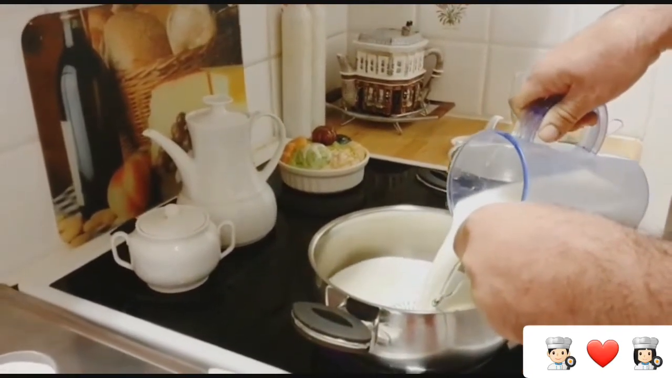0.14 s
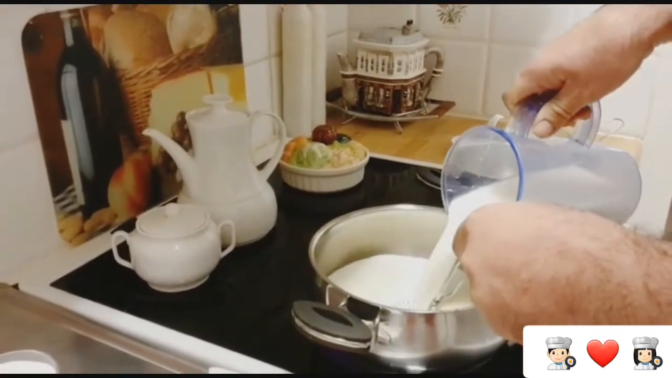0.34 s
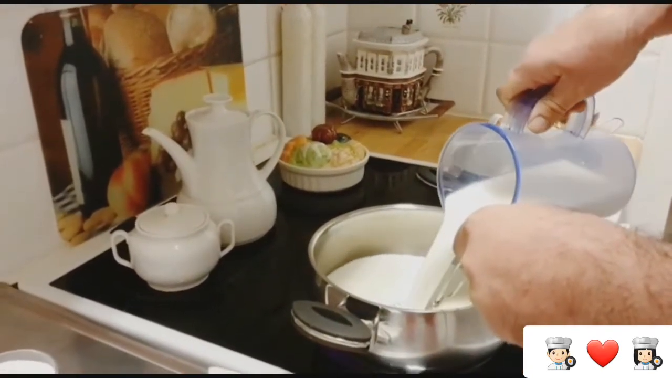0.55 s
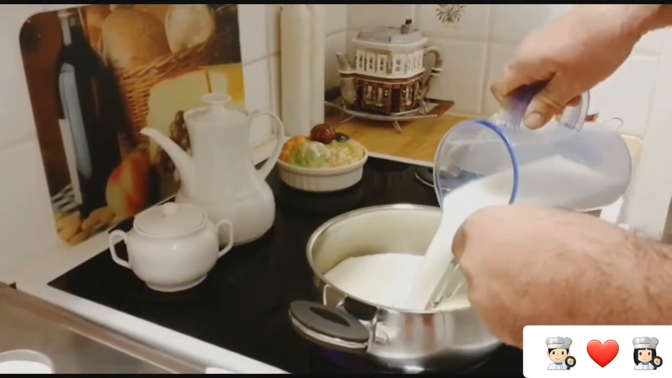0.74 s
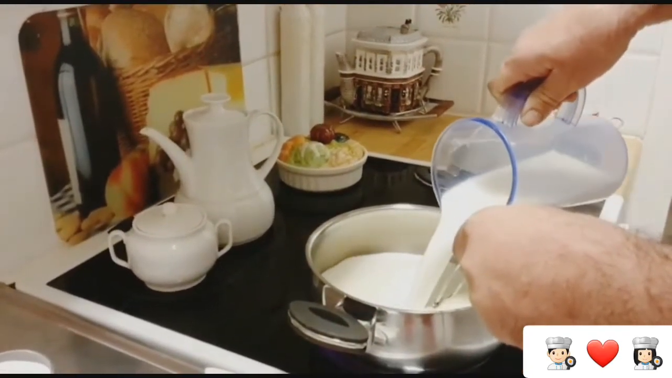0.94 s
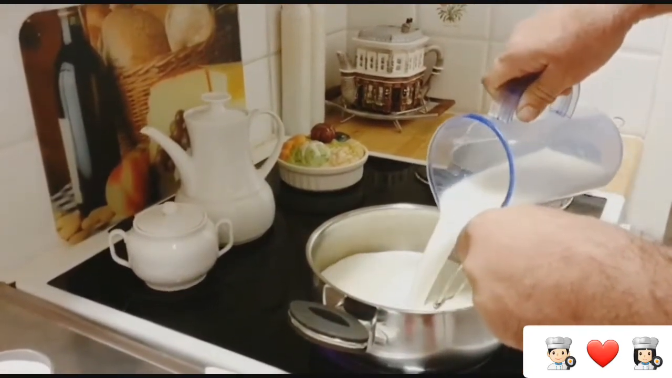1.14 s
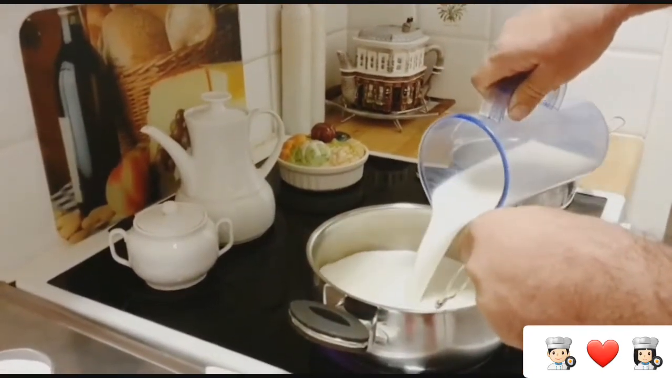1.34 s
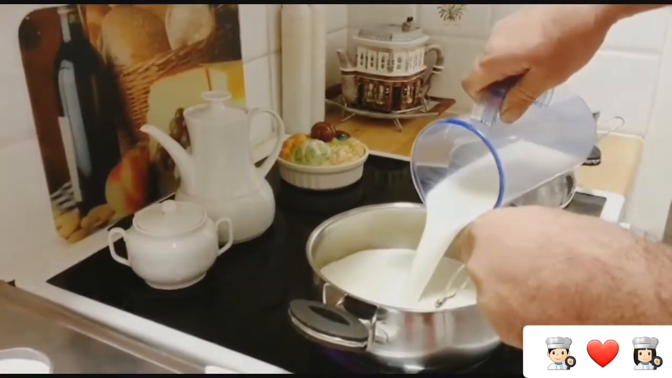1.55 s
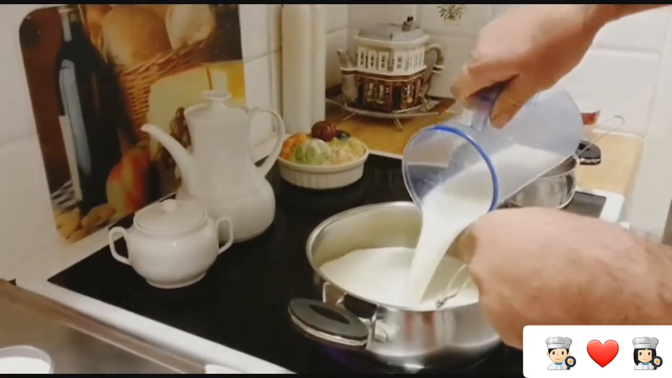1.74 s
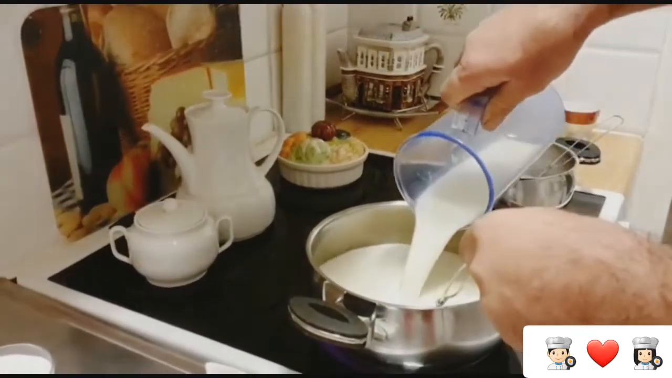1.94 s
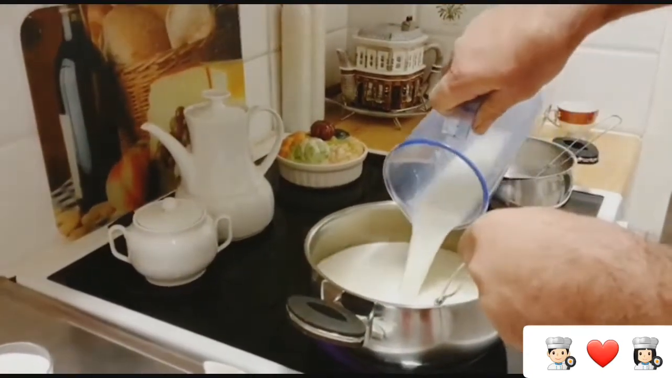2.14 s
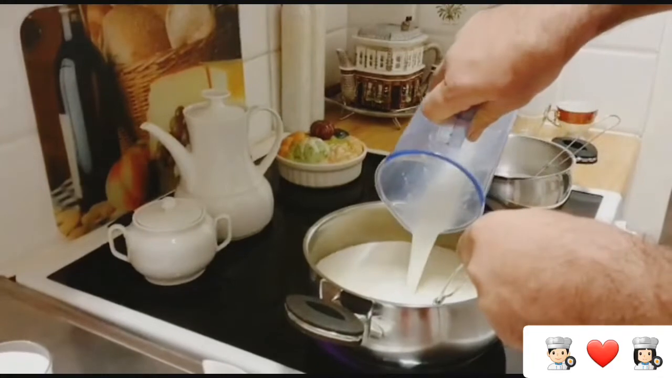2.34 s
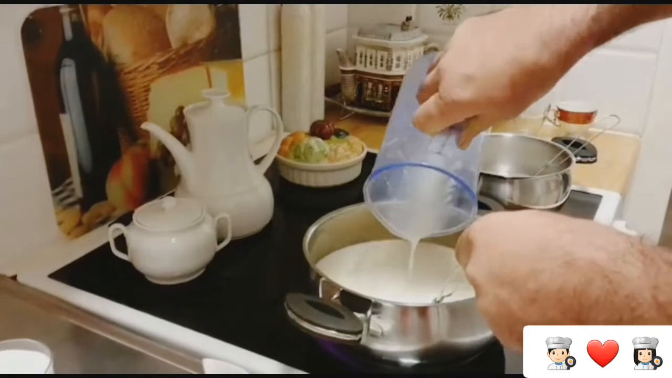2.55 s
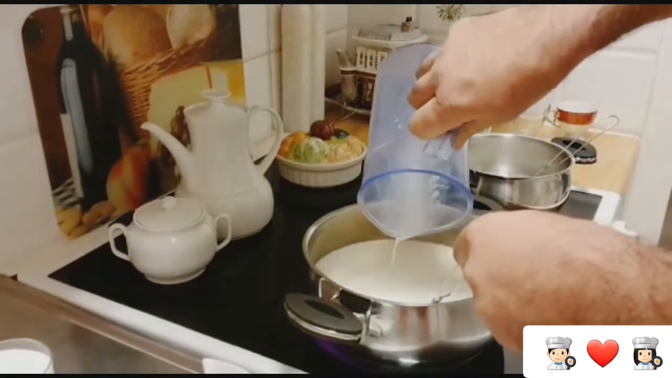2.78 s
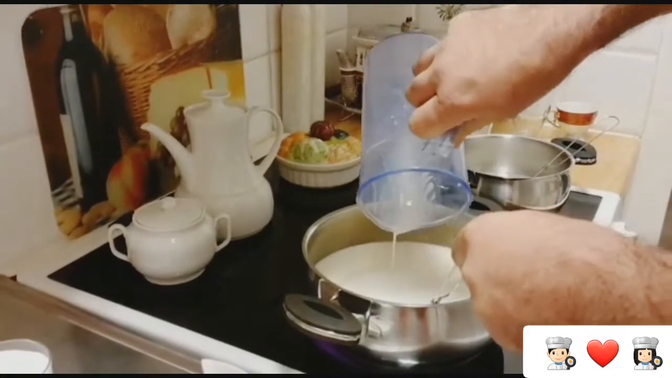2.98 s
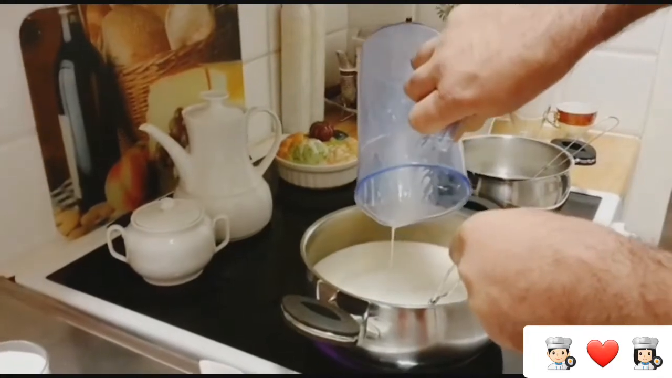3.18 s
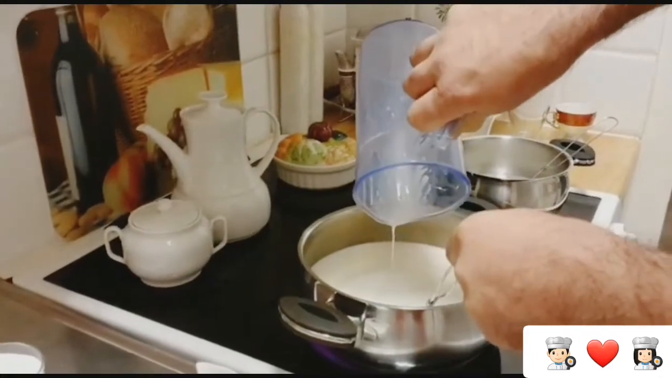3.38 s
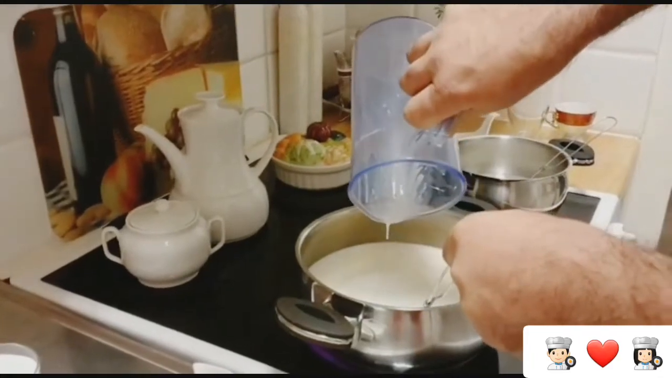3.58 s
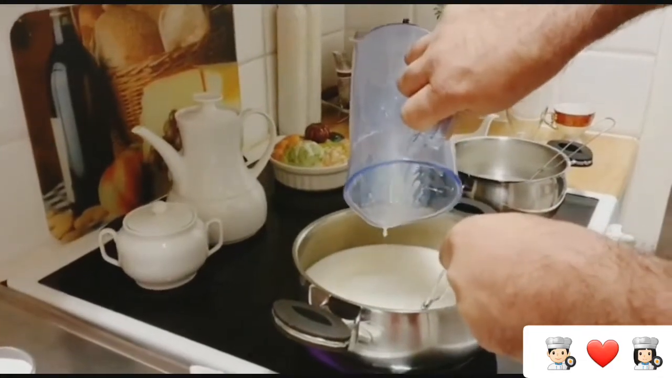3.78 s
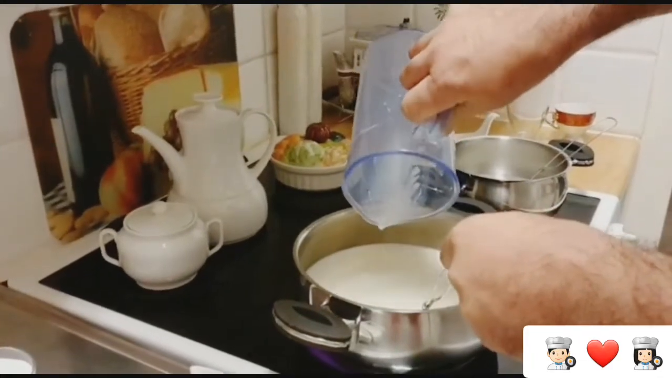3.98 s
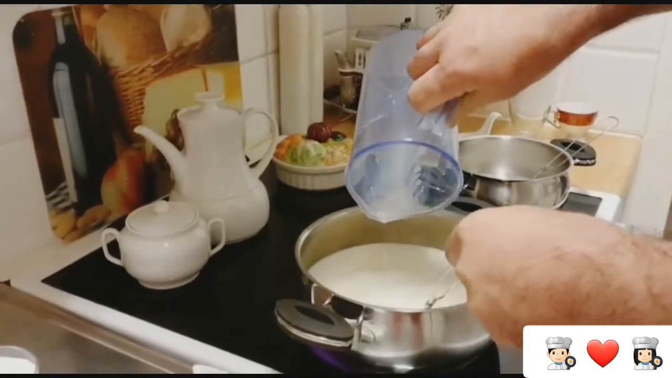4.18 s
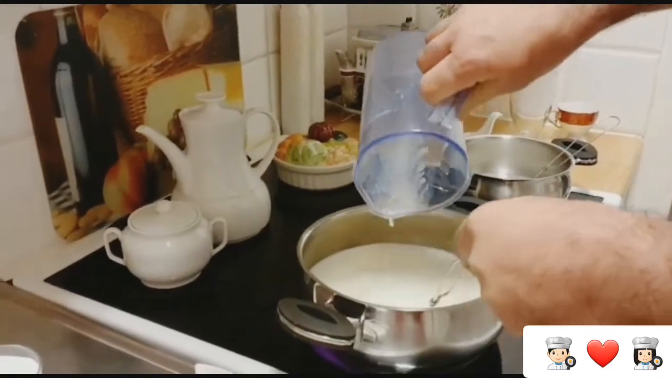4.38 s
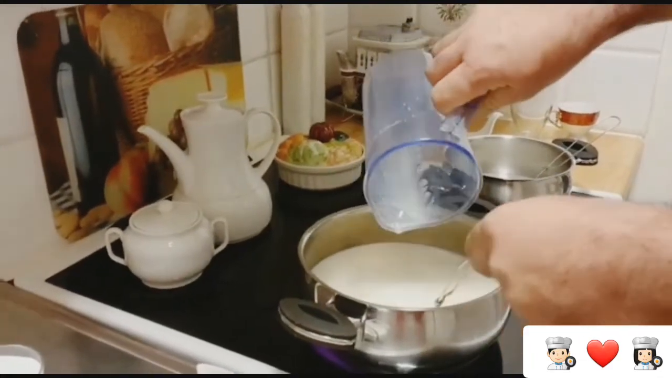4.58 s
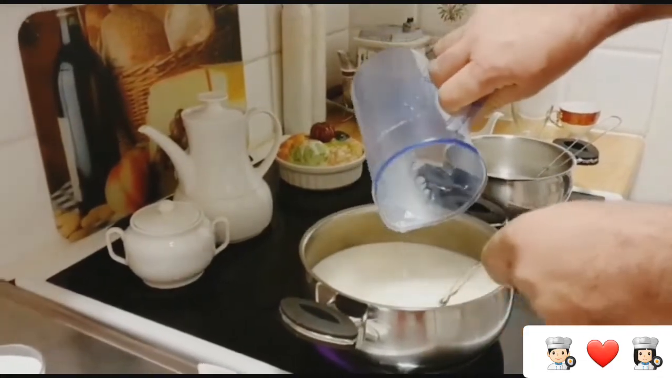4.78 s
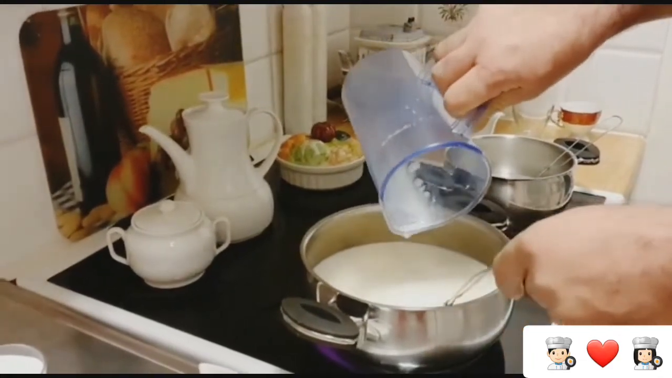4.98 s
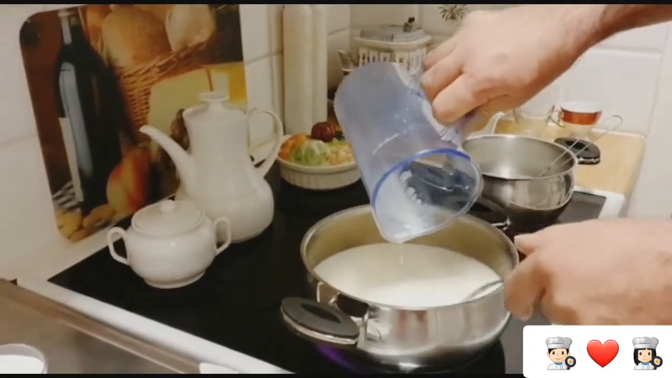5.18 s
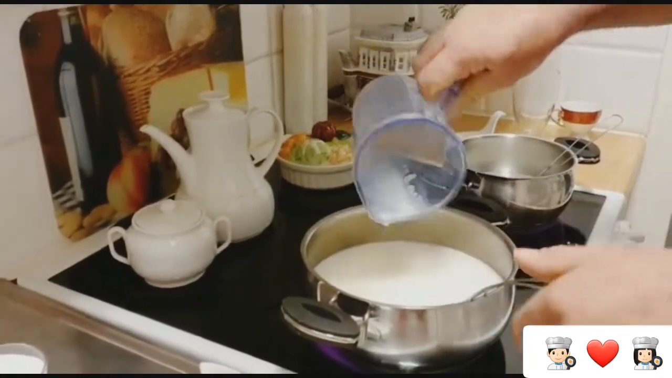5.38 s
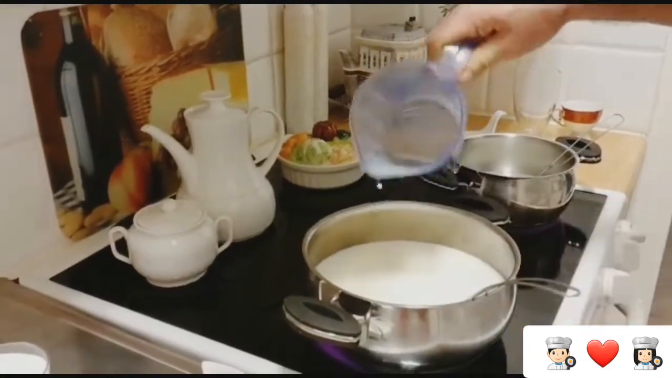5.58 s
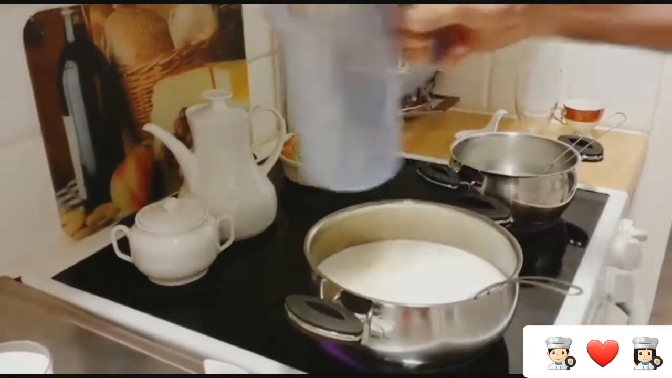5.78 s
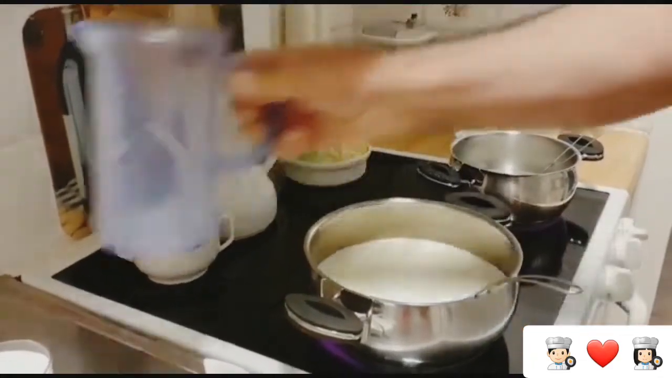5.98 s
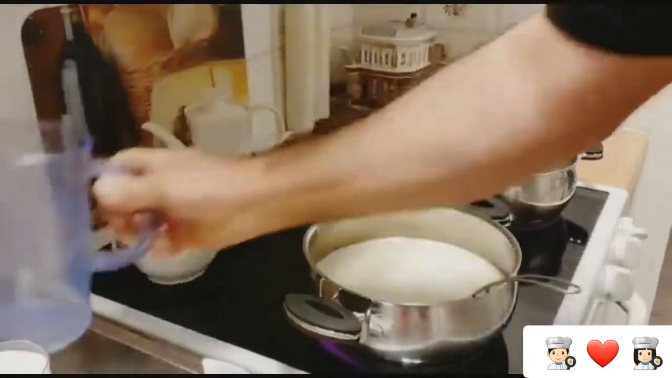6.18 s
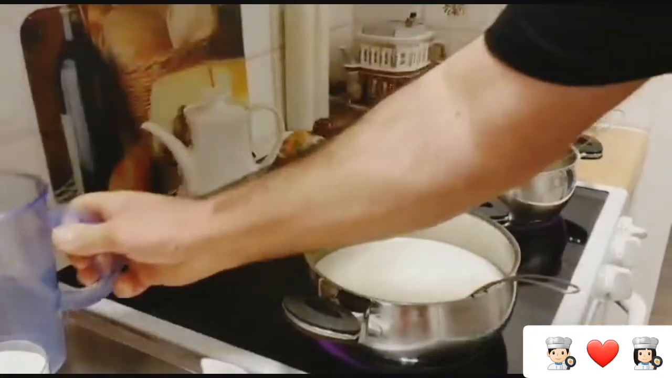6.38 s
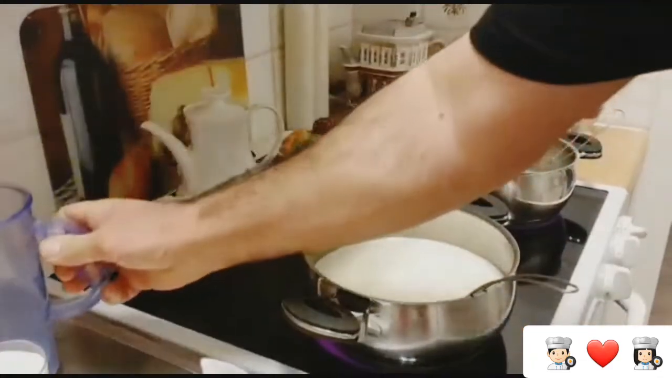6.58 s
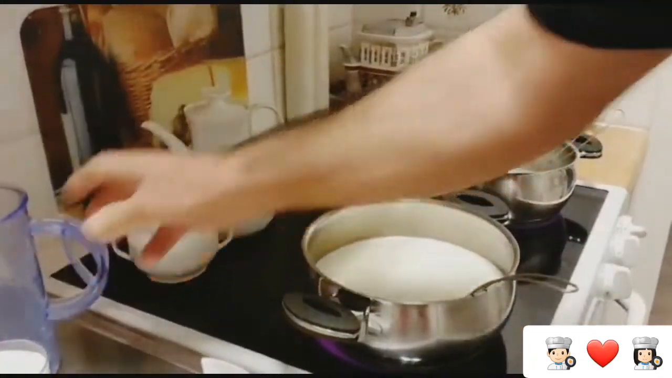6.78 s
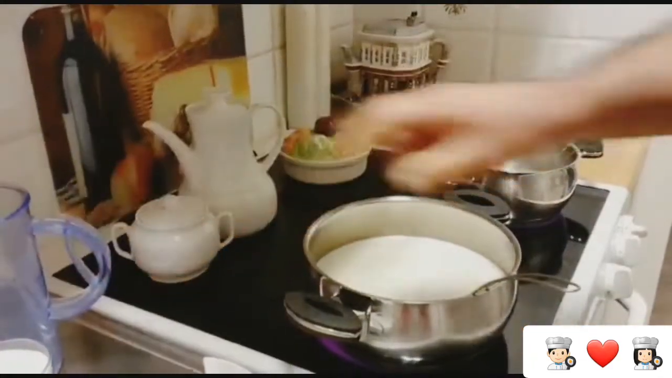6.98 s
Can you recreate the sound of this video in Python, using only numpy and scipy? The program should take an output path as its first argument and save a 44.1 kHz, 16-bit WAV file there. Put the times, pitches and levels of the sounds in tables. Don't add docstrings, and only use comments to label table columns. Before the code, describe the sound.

In a softly humming kitchen, poured milk bubbles and drips, hands scuff plastic, a wire whisk clinks on steel, and a plastic jug knocks the worktop.

```python
import sys
import numpy as np
from scipy import signal
from scipy.fft import rfft, irfft, next_fast_len
from scipy.io import wavfile
from scipy.ndimage import uniform_filter1d, map_coordinates

SR = 44100
rng = np.random.default_rng(int(sys.argv[2]) if len(sys.argv) > 2 else 0)


def makeup_ratio(level_db):
    decades = np.asarray(level_db, float) / 20
    return 10 ** decades


def unload_wav(signal):
    wavfile.write(
        sys.argv[1],
        SR,
        np.round(np.clip(np.atleast_2d(signal).T, -1, 1) * 32767).astype(np.int16),
    )


N = 310023
T = np.arange(N) / SR
ALIKE_HZ = 470

# start in seconds, peak in dB, large bubble in Hz, small minus large in dB.
DRIP_ROWS = [(2.129, -53, 2340, 5), (2.273, -54.5, 2370, -5), (2.306, -48.5, 1400, -11),
             (2.473, -53.5, 1285, -33), (2.539, -50, 2200, -24), (2.621, -52.5, 2190, -22),
             (2.654, -44, 2200, -19), (2.659, -52.5, 1450, -19), (2.714, -41.5, 2200, -20.5),
             (2.759, -44, 2200, -17), (2.833, -51, 1526, -4), (2.959, -48, 1443, -28),
             (3.03, -43.5, 2170, -29), (3.11, -38.5, 2050, -22), (3.139, -47, 1710, -11),
             (3.25, -41, 2190, -24), (3.294, -48, 2190, -12)]


def unit(x):
    return x / np.sqrt(np.mean(x ** 2))


def colour(x, points):
    hz, db = np.transpose(points)
    f = np.arange(x.shape[-1] // 2 + 1) * SR / x.shape[-1] + 1
    gain = makeup_ratio(np.interp(np.log(f), np.log(hz), db))
    return irfft(rfft(x) * gain, x.shape[-1])


def band(x, lo_hz, hi_hz):
    sos = signal.butter(2, [lo_hz, min(hi_hz, .45 * SR)], "band", fs=SR, output="sos")
    return signal.sosfilt(sos, x)


def add(track, start_s, piece):
    i = int(start_s * SR)
    track[..., i:i + piece.shape[-1]] += piece[..., :N - i]


def onset(t, rise_s):
    return np.minimum(t / rise_s, 1)


def ring(hz, t60_s, glide=0., length_s=.6):
    t = T[:int(length_s * SR)]
    phase = 2 * np.pi * hz * t * (1 + glide * onset(t, t60_s))
    return np.sin(phase) * np.exp(-np.log(1000) * t / t60_s)


def noise_hit(lo_hz, hi_hz, t60_s, rise_s):
    t = T[:SR // 4]
    noise = unit(band(rng.standard_normal(len(t)), lo_hz, hi_hz))
    return noise * makeup_ratio(-60 * t / t60_s) * onset(t, rise_s)


def crackle(spread_db):
    size = np.minimum(rng.exponential(size=N), 4)
    return unit(rng.standard_normal(N) * makeup_ratio(spread_db * size))


def walk(rate_hz):
    k = int(SR / rate_hz)
    step = k // 32 + 1
    slow = np.repeat(rng.standard_normal(N // k + 1), step)
    slow = uniform_filter1d(uniform_filter1d(slow, step), step)
    return np.interp(np.arange(N), np.arange(len(slow)) * k / step, unit(slow))


def patchy(x, spread_db, rate_hz):
    centres_hz = 500 * 1.3 ** np.arange(13)
    return x + sum((makeup_ratio(spread_db * walk(rate_hz)) - 1) * band(x, hz, 1.3 * hz) for hz in centres_hz)


def swells(rows, rise_share):
    t = T[::64]
    fade_db = 30
    power = 0
    for s, db, sink_s in rows:
        away = np.maximum((t - s) / sink_s, (s - t) / (rise_share * sink_s))
        power = power + makeup_ratio(db - fade_db * away) ** 2
    return np.interp(T, t, np.sqrt(power))


def pair():
    mid, side = rng.standard_normal((2, N))
    side = band(side, ALIKE_HZ, SR) + 0.32 * side
    return np.array([mid + side, mid - side])


def place(dry, lag_s, room_db, scatter_rad):
    room_t60_s, room_treble_t60_s = 0.36, 0.22
    scatter_hz = 199.8
    size = next_fast_len(N + SR // 2)
    t = T[:SR // 2]
    wash = band(pair()[:, :len(t)], 62, SR) * onset(t, 0.0036)
    low = signal.sosfilt(signal.butter(1, 2500, fs=SR, output="sos"), wash)
    wash = low * makeup_ratio(-60 * t / room_t60_s) + (wash - low) * makeup_ratio(-60 * t / room_treble_t60_s)
    wash = wash / np.sqrt(np.sum(wash ** 2) / 2) * makeup_ratio(room_db)
    f = np.arange(size // 2 + 1) * SR / size
    turn = map_coordinates(rng.standard_normal(200), [f / scatter_hz], mode="mirror")
    turn = turn * scatter_rad / (1 + (ALIKE_HZ / (f + 1)) ** 2)
    lags_s, signs = np.array([[lag_s], [0]]), np.array([[1], [-1]])
    direct = np.exp(-2j * np.pi * f * lags_s + 1j * turn * signs)
    return irfft(rfft(dry, size) * (direct + rfft(wash, size)), size)[:, :N]


def lean(x, sides):
    return np.array([colour(port, [(hz, sign * db / 2) for hz, db in sides]) for port, sign in zip(x, (1, -1))])


def body(crowds):
    stiff_hz = 350
    offsets = (np.arange(6) + rng.random((len(crowds), 6))) / 6 - .5
    signs = rng.choice([-1, 1], offsets.shape)
    damping = rng.uniform(.6, 1.2, offsets.shape)
    out = np.zeros(SR // 2)
    for (hz, width_hz, db, t60_s), row, sign, damp in zip(crowds, offsets, signs, damping):
        crowd = 0
        for o, g, d in zip(row, sign, damp):
            polarity = g if hz > stiff_hz else 1
            crowd = crowd + polarity * ring(hz + width_hz * o, t60_s * d, length_s=min(t60_s, .4))
        add(out, 0, makeup_ratio(db) * crowd / np.abs(crowd).max())
    return out * onset(T[:SR // 2], 0.0025)


def kitchen():
    # line in Hz, level in dB, wobble width in Hz.
    hum_lines = [(51.4, -72, 4.6), (103, -69.5, 4.93), (200.1, -64.5, 1.58), (299.8, -68.5, 1.15),
                 (406, -83, 4.6)]
    # frequency in Hz, density in dB per Hz.
    air_colour = [(12, -2.5), (28, -3.5), (45, -5.5), (102, 3), (150, -3.5), (202, -3), (252, -7),
                  (306, -7.5), (351, -5.5), (577, -18.5), (1600, -28), (2290, -24), (7280, -30),
                  (9080, -36), (12300, -28.5), (14500, -31.5)]
    hum = 0
    for hz, db, width_hz in hum_lines:
        level = makeup_ratio(db + 0.2 * width_hz * walk(3.77)) * np.sqrt(2)
        phase = 2 * np.pi * np.cumsum(hz + 0.178 * width_hz * walk(5.99)) / SR
        hum = hum + level * np.sin(phase)
    air = patchy(unit(colour(pair(), air_colour)), spread_db=3.7, rate_hz=18)
    return hum * makeup_ratio(np.array([[0.4], [-0.4]])) + air * makeup_ratio(-64.5 + 1.0 * walk(3.71))


def bumps():
    # start in seconds, peak in dB, pitch in Hz, length in cycles.
    bump_rows = [(0.515, -56, 120, 3.3), (0.6, -61, 460, 25), (5.51, -58, 480, 23),
                 (4.599, -49.5, 42.6, 2.4), (5.141, -50, 45, 1.5), (5.369, -45, 253, 15.4),
                 (5.49, -45.5, 132.4, 4.5), (5.531, -56, 37, 1.9), (6.66, -42, 31, 1.6),
                 (6.78, -47, 34, 4.9), (6.946, -38, 104, 2.6), (6.77, -31, 440, 20),
                 (6.815, -38.5, 466, 18), (6.8, -44, 247, 9.6), (6.655, -33, 282, 16),
                 (6.68, -35.5, 400, 20), (6.985, -44, 450, 14), (6.862, -41, 420, 8), (6.7, -38, 205, 14),
                 (6.95, -38, 480, 14)]
    out = np.zeros(N)
    for s, db, hz, cycles in bump_rows:
        size = int(cycles / hz * SR)
        add(out, s, makeup_ratio(db) * np.hanning(size) * np.sin(2 * np.pi * hz * T[:size]))
    return out


def jug():
    # start in seconds, peak in dB, contact in seconds.
    knock_rows = [
        (6.65, -23.5, 0.00045),
        (6.659, -24.5, 0.0007),
        (6.674, -35, 0.00025),
        (6.771, -36, 0.0009),
        (6.786, -39.5, 0.0013),
        (6.862, -42, 0.002),
        (6.937, -40.5, 0.0013),
        (6.957, -39, 0.0011),
    ]
    # centre in Hz, width in Hz, level in dB, t60 in seconds.
    worktop_modes = [(76, 40, -26, 0.112), (97, 17, -5, 0.08), (130.4, 15, -3.5, 0.2), (161.8, 15, 2, 0.18),
                     (235, 22, 3.5, 0.19), (285, 17, -5, 0.16), (334, 23, -10, 0.17),
                     (400, 33, -0.5, 0.086), (450, 49, -5.5, 0.097), (540.7, 84, -5.5, 0.23),
                     (718, 210, -9.5, 0.11), (926, 150, -7, 0.075), (1052, 60, -1.5, 0.065),
                     (1307, 233, 1, 0.078), (1660, 315, 7, 0.04), (2136, 166, 12, 0.062),
                     (2478, 100, -0.5, .06), (2880, 480, -6, 0.074), (3370, 400, -1, 0.06),
                     (3860, 200, -1, .05), (4430, 190, -7, .07), (4970, 300, -6, .07),
                     (5900, 700, -10, .05)]
    # frequency in Hz, difference in dB.
    jug_sides = [(60, 1.5), (110, 0), (200, 1.5), (370, -6), (680, 1), (1250, 2), (2290, 2), (4200, 0.0),
                 (7710, -2.0), (14100, 2)]
    out = np.zeros(N)
    for s, db, contact_s in knock_rows:
        push = np.hanning(int(contact_s * SR) + 3)
        board = signal.fftconvolve(body(worktop_modes), push / push.sum())
        slap = makeup_ratio(-5.5) * noise_hit(460, 5900, t60_s=0.051, rise_s=0.0039)
        thud = makeup_ratio(-8.5) * noise_hit(134, 580, t60_s=0.22, rise_s=0.0046)
        add(out, s, makeup_ratio(db) * board)
        add(out, s, makeup_ratio(db) * (slap * 0.00078 / contact_s + thud))
    return lean(place(out, lag_s=-0.000286, room_db=-3.5, scatter_rad=0.8), jug_sides)


def notch(x):
    # centre in Hz, width in Hz, depth 0-1.
    notch_bands = [(2580, 480, .99), (4330, 330, .99), (6050, 400, .6)]
    for hz, width_hz, depth in notch_bands:
        x = x - depth * signal.lfilter(*signal.iirpeak(hz, hz / width_hz, SR), x)
    return x


def wires_ring(wire_notes):
    gains = rng.uniform(0.23, 1, len(wire_notes))
    return sum(g * makeup_ratio(db) * ring(hz, t60_s, length_s=.15) for (hz, db, t60_s), g in zip(wire_notes, gains))


def whisk():
    # blow in seconds, peak in dB.
    clink_rows = [
        (5.348, -37),
        (5.351, -34),
        (5.359, -34.5),
        (5.369, -39),
        (5.378, -39),
        (5.388, -41.5),
        (5.397, -44),
    ]
    # centre in Hz, width in Hz, level in dB, t60 in seconds.
    rim_modes = [(642, 173, -13.5, 0.14), (1154, 210, -10.5, 0.13), (1780, 250, 0, 0.054),
                 (2039, 260, 0, 0.045), (13800, 500, -5, .09), (3200, 506, -3.5, 0.079),
                 (3800, 470, -6, 0.055), (4950, 335, -6, 0.06), (5600, 300, -13, .08),
                 (6500, 400, -10, 0.037), (7090, 390, 2.5, 0.081), (7500, 450, -2, 0.067),
                 (7990, 420, 1, 0.045), (8750, 690, 0.5, 0.084), (9700, 480, 0, 0.1), (10600, 860, -5, 0.1),
                 (11500, 420, -3, 0.063), (12040, 590, -4, 0.053), (12900, 800, -1, 0.05)]
    # note in Hz, level in dB, t60 in seconds.
    wire_notes = [(4845, -6, .1), (5670, -9.5, 0.084), (6830, -7.5, 0.088), (7282, -3, 0.11),
                  (7500, -5, .1), (8000, -3, 0.089), (8030, -2.5, .08), (8470, -11, .09), (9525, -2, 0.11),
                  (10300, -2, 0.076), (10770, -6, .1), (11640, -2, 0.076), (12640, -4, 0.07)]
    # start in seconds, peak in dB, pitch in Hz, t60 in seconds.
    handle_notes = [
        (5.35, -31, 1980, .035),
        (5.359, -31, 2060, .06),
        (5.38, -38, 2040, .04),
        (5.35, -36, 4900, .04),
        (5.397, -40, 4800, .05),
    ]
    # frequency in Hz, difference in dB.
    whisk_sides = [(60, -1.5), (110, -1.0), (200, 7), (370, 4), (680, -0.5), (1250, 1.0), (2290, 0),
                   (4200, -2.5), (7710, 0.0), (14100, 1.0)]
    out = np.zeros(N)
    sizzle = noise_hit(6300, 13000, t60_s=0.049, rise_s=0.00297)
    for s, db in clink_rows:
        add(out, s, makeup_ratio(db) * body(rim_modes))
        add(out, s, makeup_ratio(db - 1.5) * sizzle)
        add(out, s, makeup_ratio(db - 2.5) * wires_ring(wire_notes))
    for s, db, hz, t60_s in handle_notes:
        add(out, s, makeup_ratio(db) * onset(T[:SR // 10], .002) * ring(hz, t60_s, length_s=.1))
    return lean(notch(place(out, lag_s=-0.000027, room_db=-3.0, scatter_rad=0.8)), whisk_sides)


def scuffs():
    # start in seconds, peak in dB, t60 in seconds, bright minus dull in dB.
    splash_rows = [(0.197, -55, 0.088, 4), (0.27, -56.5, 0.14, 0), (0.43, -60, 0.07, -2),
                   (0.828, -61, 0.07, 0), (0.96, -60, 0.08, -3), (1.285, -64.5, 0.067, 11),
                   (1.733, -65, 0.08, 0), (2.83, -62, 0.07, 1.5), (3.0, -63, 0.05, 9),
                   (2.375, -64.5, 0.05, 5), (0.063, -47.5, 0.15, 10), (0.616, -55.5, 0.11, -6),
                   (0.707, -56, 0.1, 4), (1.899, -59.5, 0.14, 2), (2.168, -63.5, 0.056, 20),
                   (2.639, -53.5, 0.076, -5.5), (3.474, -68, 0.083, -2)]
    # start in seconds, peak in dB, t60 in seconds, bright minus dull in dB.
    scuff_rows = [(3.628, -54, 0.07, 1), (3.645, -46.5, 0.07, 4), (3.66, -42.5, 0.11, 3.5),
                  (3.83, -58, 0.18, 8), (3.998, -54, 0.15, -3.5), (4.167, -41, 0.067, -0.5),
                  (4.181, -40.5, 0.11, 2), (4.239, -49.5, 0.061, -8), (4.282, -49, 0.12, 1),
                  (4.32, -46.5, 0.067, 3), (4.335, -44, 0.094, -1.5), (4.826, -51.5, 0.09, -6),
                  (5.026, -46.5, 0.11, -11), (5.132, -51, 0.066, -5), (5.15, -52.5, 0.045, -9),
                  (5.07, -61, 0.12, 0), (5.185, -52.5, 0.13, -4), (5.215, -51, 0.18, -5),
                  (5.25, -56.5, 0.1, -1), (5.279, -43.5, 0.065, 5), (5.291, -41.5, 0.095, 1.5),
                  (5.331, -55, 0.06, 21), (5.43, -54, 0.25, 9), (5.622, -48, 0.22, -10),
                  (5.644, -45, 0.076, 7), (5.66, -41, 0.099, 5), (5.774, -57, 0.09, 16),
                  (5.873, -57.5, 0.053, 11), (5.916, -51, 0.28, -10.5), (5.968, -53, 0.14, -10.5),
                  (6.182, -52, 0.1, 11), (6.376, -37.5, 0.072, -5.5), (6.392, -41.5, 0.08, 0),
                  (6.427, -53.5, 0.096, 4), (6.654, -45, 0.1, 16), (6.771, -51.5, 0.19, -29.5),
                  (6.816, -44.5, 0.041, -2), (6.944, -58.5, 0.1, -33), (6.968, -61, 0.045, -12)]
    rise_s = 0.015
    swell = np.zeros((3, N))
    t = T[:SR // 2]
    for s, db, t60_s, tilt_db in splash_rows + scuff_rows:
        shape = onset(t, rise_s) ** 2 * makeup_ratio(-60 * np.maximum(t - rise_s, 0) / t60_s)
        balance_db = np.array([[-3.5 - tilt_db / 2], [0], [-5.5 + tilt_db / 2]])
        add(swell, s - .5 * rise_s, makeup_ratio(db - 2 + balance_db) * shape)
    grit = crackle(0.65)
    parts = [unit(band(grit, lo, hi)) for lo, hi in ((125, 2520), (1250, 6520), (4000, 13500))]
    return np.sum(swell * parts, axis=0)


def taps():
    # start in seconds, peak in dB, pitch in Hz, t60 in seconds.
    tap_rows = [(3.998, -55, 960, 0.072), (4.83, -45.5, 950, 0.031), (5.024, -31.5, 994, 0.032),
                (5.037, -37.5, 970, 0.017), (5.131, -37, 1450, 0.038), (5.133, -38, 2300, .03),
                (5.135, -36, 3100, 0.029), (5.144, -36.5, 1810, 0.03), (5.152, -44, 1400, 0.027),
                (5.156, -40, 2520, 0.026), (5.28, -38, 2440, 0.04), (5.652, -36, 530, 0.033),
                (6.379, -47, 1990, 0.033), (6.938, -40, 1113, 0.048), (6.958, -37.5, 885, .05),
                (6.958, -38, 2067, 0.034), (5.64, -45.5, 1050, 0.054), (5.66, -47, 1146, .05),
                (3.65, -50, 985, .05)]
    out = np.zeros(N)
    for s, db, hz, t60_s in tap_rows:
        add(out, s, makeup_ratio(db - 3.0) * body([(hz, 0.2 * hz, 0, t60_s)]))
    return out


def rustle():
    # peak time in seconds, peak in dB, sinking time in seconds.
    gesture_rows = [(3.85, -70, 0.5), (4.3, -66, 0.4), (4.86, -66, 0.23), (5.1, -56, 0.13),
                    (5.3, -55.5, 0.13), (5.43, -55, 0.27), (5.6, -72, 1), (5.93, -60.5, 0.54),
                    (6.05, -61.5, 0.19), (6.42, -57, 0.28), (6.83, -61.5, 0.5)]
    # frequency in Hz, density in dB per Hz.
    rustle_colour = [(180, -15), (300, 2.5), (643, -9.5), (2000, -4), (7330, -10), (9660, -23),
                     (11400, -12), (14500, -32)]
    noise = unit(colour(patchy(crackle(3.6), spread_db=2.5, rate_hz=16), rustle_colour))
    return noise * swells(gesture_rows, rise_share=0.84) * makeup_ratio(2.5 + 5.7 * np.tanh(walk(25)))


def hands():
    return place(scuffs() + taps() + rustle(), lag_s=.0001, room_db=-2.0, scatter_rad=0.72)


def pot_air(x):
    # centre in Hz, width in Hz, level in dB.
    air_modes = [(1450, 83, -32), (2190, 360, 8.5), (2960, 250, -8), (3350, 460, -18), (4200, 330, -24)]
    return sum(makeup_ratio(db) * signal.lfilter(*signal.iirpeak(hz, hz / width_hz, SR), x)
               for hz, width_hz, db in air_modes)


def gurgle():
    length_s = 3.6
    out = np.zeros(N)
    swell = onset(T[:int(.03 * SR)], .003)
    for when, pitch, size in rng.random((1700, 3)):
        hz = 950 * 3.9 ** pitch
        bubble = swell * ring(hz, 40 / hz, glide=0.13, length_s=.03)
        add(out, length_s * when, makeup_ratio(7.9 * size + 7.0 * pitch) * bubble)
    out = out + .9 * unit(pot_air(out)) * out.std()
    out = unit(out[:int(length_s * SR)])
    return np.pad(out, (0, N - len(out)))


def stream():
    # peak time in seconds, gurgle in dB, sinking time in seconds, spray minus gurgle in dB.
    glug_rows = [(0.01, -49, 0.1, -15), (0.07, -54, 0.4, 4), (0.289, -55.5, 0.34, -3.5),
                 (0.62, -56.5, 0.07, -10), (0.74, -60, 0.43, -5), (0.88, -59.5, 0.26, -10),
                 (1.019, -55, 0.2, -12), (1.14, -65, 0.35, -4.5), (1.39, -60.5, 0.14, -11),
                 (1.49, -62, 0.15, -10), (1.88, -55.5, 0.11, -16), (2.16, -61, 0.14, -12),
                 (2.31, -58, 0.12, -13), (2.55, -59.5, 0.2, -12), (2.66, -55, 0.19, -8),
                 (2.86, -55.5, 0.1, -9.5), (3.13, -63.5, 0.2, -17)]
    glug_rise = 1.4
    stirs = swells([(s, db - 22.5, 0.061) for s, db, *_ in DRIP_ROWS], rise_share=0.32)
    flow = swells([row[:-1] for row in glug_rows], glug_rise) + stirs
    spatter = swells([(s, db + spray_db, sink_s) for s, db, sink_s, spray_db in glug_rows], glug_rise)
    spatter = spatter + makeup_ratio(-14.5) * stirs
    spray = unit(band(crackle(6.6), 2260, 7600)) * makeup_ratio(-6.5 + 4.3 * walk(27.96))
    return gurgle() * makeup_ratio(-8.0) * flow + spray * spatter


def burst(hz, t60_s):
    out = np.zeros(SR // 8)
    soft = onset(T[:SR // 10], .0022)
    t60_s = np.clip(t60_s, .005, .06)
    add(out, 0, soft * ring(hz, t60_s, glide=0.029, length_s=.1))
    for detune, late in rng.random((3, 2)):
        near_hz = hz * (1 + 0.27 * (detune - .5))
        add(out, .018 * late, 0.5 * soft * ring(near_hz, 0.72 * t60_s, glide=0.02, length_s=.1))
    return out


def bubbles():
    # start in seconds, peak in dB, large bubble in Hz, small minus large in dB.
    bubble_rows = [(0.035, -31, 2190, -15), (0.049, -40, 2260, -4), (0.065, -28, 2215, -14),
                   (0.109, -52, 2200, 8), (0.13, -52, 2280, -19), (0.196, -42, 2190, -1),
                   (0.229, -56, 2265, -16), (0.252, -46, 2200, -10), (0.26, -47, 2260, -8),
                   (0.268, -39, 2180, -12), (0.284, -45, 2090, -1.5), (0.392, -50, 1660, -2.5),
                   (0.402, -52, 2200, -6), (0.425, -50.5, 2243, -8), (0.617, -46, 1735, -9),
                   (0.71, -49, 2150, -4), (0.745, -57, 2200, -9), (0.781, -51, 2370, -14),
                   (0.83, -55, 2300, -3), (0.859, -54.5, 1930, -1), (0.89, -55, 2390, -3),
                   (0.99, -54, 1990, -11), (1.02, -58, 2300, -12), (0.965, -47, 2300, -24),
                   (1.079, -65, 2310, -16), (1.37, -60.5, 2160, -5), (1.472, -56, 1320, -11),
                   (1.826, -59.5, 2410, 0), (1.894, -54.5, 1250, -4)]
    # start in seconds, peak in dB, pitch in Hz, t60 in seconds.
    stray_rows = [(.02, -46.5, 3270, 0.062), (0.033, -42, 1507, 0.069), (.09, -42, 3500, 0.04),
                  (.255, -54.5, 1420, 0.054), (.618, -47, 4520, 0.032), (.7, -57.5, 1270, 0.056),
                  (.957, -52, 5510, 0.027), (1.29, -56, 7980, 0.028), (2.135, -52, 3200, 0.046),
                  (2.472, -57, 2200, 0.044), (2.488, -54, 1290, .03), (2.545, -59, 1540, .05),
                  (2.76, -54.5, 1450, 0.047), (2.83, -56, 3150, .04), (2.845, -56, 2320, .06),
                  (2.64, -57, 3700, .03), (2.645, -54, 2060, .03), (3.115, -56, 2740, .04),
                  (2.54, -56.5, 964, 0.073), (2.575, -57.5, 960, 0.049), (2.625, -55, 3698, 0.036),
                  (2.63, -54, 724, 0.06), (3.002, -51, 4520, 0.028), (3.002, -54, 2780, .025),
                  (3.112, -51, 1440, 0.0326), (3.145, -50, 3040, 0.024), (3.474, -54.5, 4500, .036),
                  (3.476, -56, 3590, 0.063), (3.519, -61, 3800, 0.035), (5.776, -46, 8570, 0.032),
                  (1.085, -59, 4620, 0.037), (1.11, -60.5, 4900, .04), (1.74, -61, 2620, .04),
                  (1.785, -60, 1750, 0.026), (.113, -46, 2800, .03), (.1, -55, 6270, .03),
                  (.62, -50, 2150, .025), (.62, -54, 1400, 0.027), (2.305, -57, 2080, .04),
                  (3.235, -59, 2800, .03)]
    pings, plops = np.zeros((2, N))
    for s, db, big_hz, small_db in bubble_rows + DRIP_ROWS:
        t60_s = 0.028 * (2200 / big_hz) ** 1.5
        small_hz = 2795 + 82 * rng.standard_normal()
        add(pings, s, makeup_ratio(db) * burst(big_hz, t60_s))
        add(pings, s, makeup_ratio(db + small_db) * burst(small_hz, 1.7 * t60_s))
        add(plops, s, makeup_ratio(db - 16.5) * ring(3170, 0.0034, length_s=.005))
    for s, db, hz, t60_s in stray_rows:
        add(pings, s, makeup_ratio(db) * burst(hz, t60_s))
    return pings + 3 * pot_air(plops)


def chirp():
    # start in seconds, peak in dB, resting Hz, t60 in seconds, start excess as share, settling in s.
    chirp_rows = [
        (3.916, -44.5, 3800, 0.09, .24, .0015),
        (3.922, -58, 3800, 0.11, 0.21, 0.014),
        (3.938, -52, 3830, 0.073, 0.06, 0.0077),
        (3.96, -57, 3770, .07, 0, .005),
    ]
    t = T[:SR // 8]
    out = np.zeros(N)
    for s, db, hz, t60_s, excess, settle_s in chirp_rows:
        pitch_hz = hz * (1 + excess * np.exp(-t / settle_s))
        tone = np.sin(2 * np.pi * np.cumsum(pitch_hz) / SR)
        add(out, s, makeup_ratio(db - 60 * t / t60_s) * onset(t, 0.0013) * tone)
    return out


def milk():
    return place(stream() + bubbles() + chirp(), lag_s=-0.000025, room_db=-4.5, scatter_rad=0.35)


def scene():
    return kitchen() + bumps() + jug() + whisk() + hands() + milk()


def band_limit(x):
    return signal.sosfilt(signal.butter(12, 14740, fs=SR, output="sos"), x)


def record(dry):
    top = signal.ellip(8, .2, 70, 14250, fs=SR, output="sos")
    return band_limit(signal.sosfilt(top, dry))


dry = scene()
out = record(dry)
unload_wav(out)
```